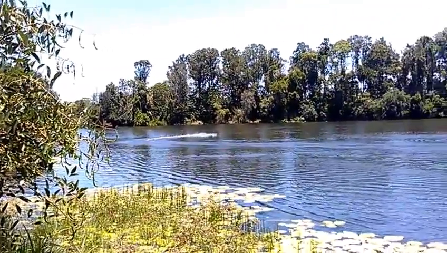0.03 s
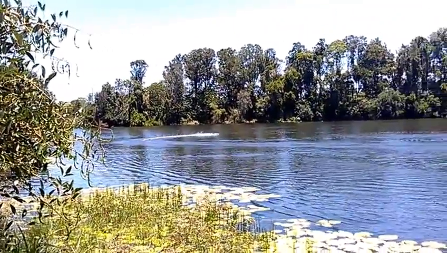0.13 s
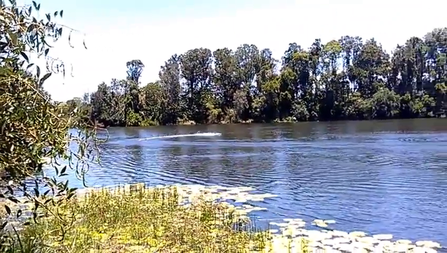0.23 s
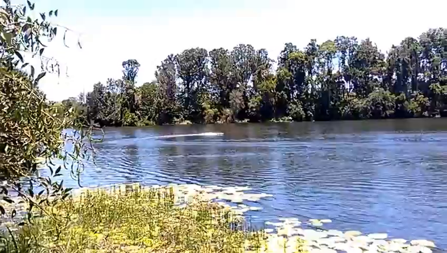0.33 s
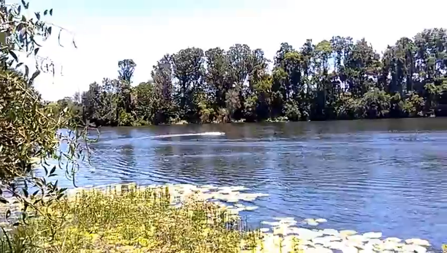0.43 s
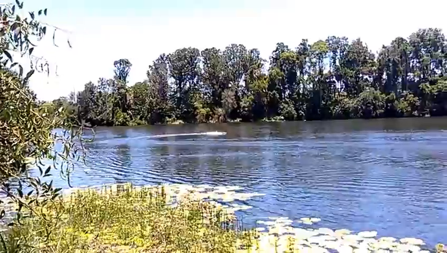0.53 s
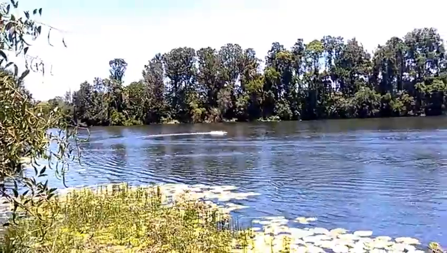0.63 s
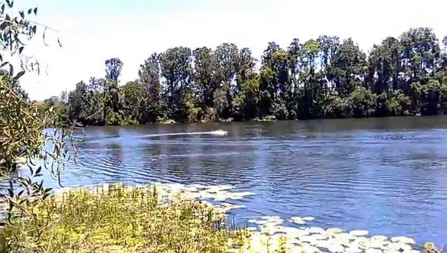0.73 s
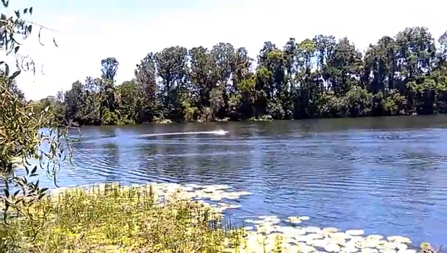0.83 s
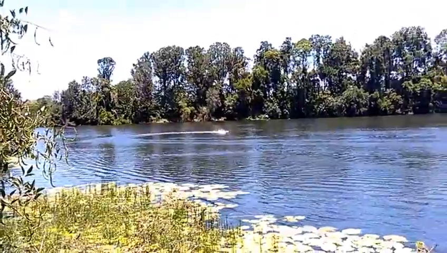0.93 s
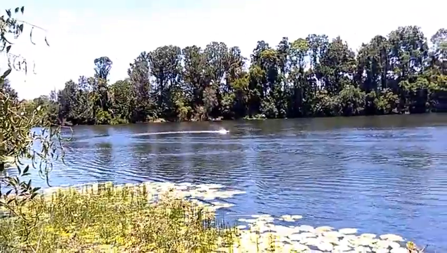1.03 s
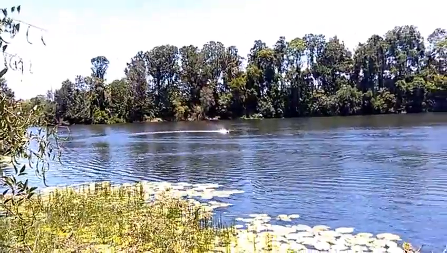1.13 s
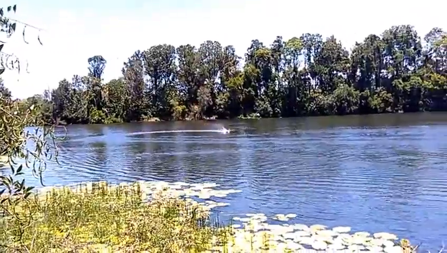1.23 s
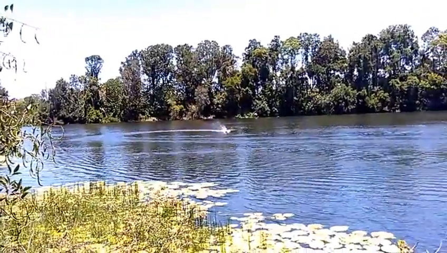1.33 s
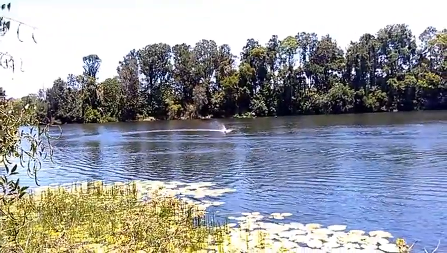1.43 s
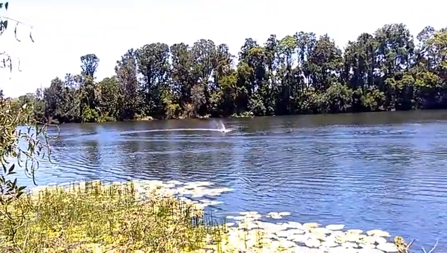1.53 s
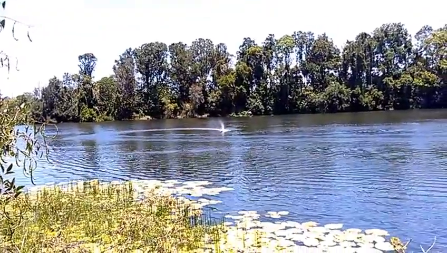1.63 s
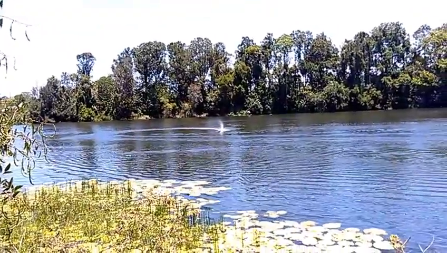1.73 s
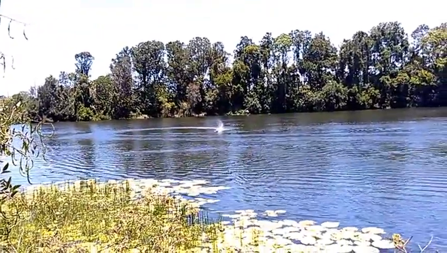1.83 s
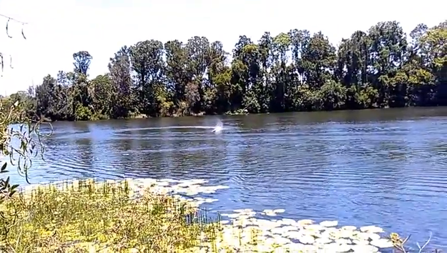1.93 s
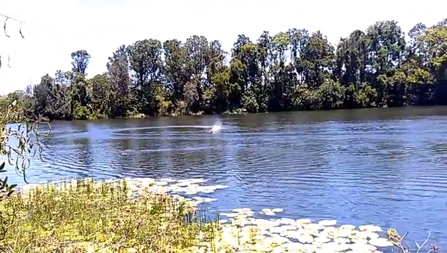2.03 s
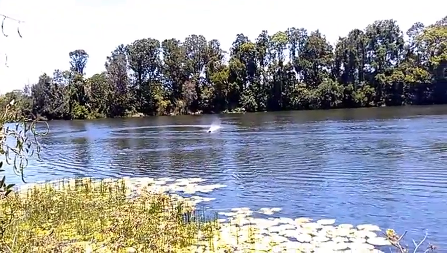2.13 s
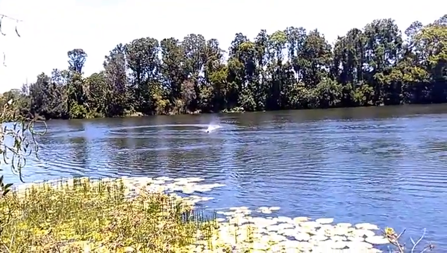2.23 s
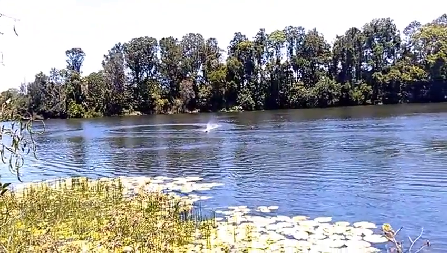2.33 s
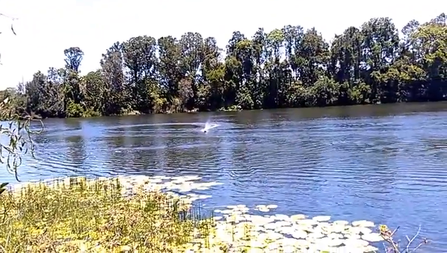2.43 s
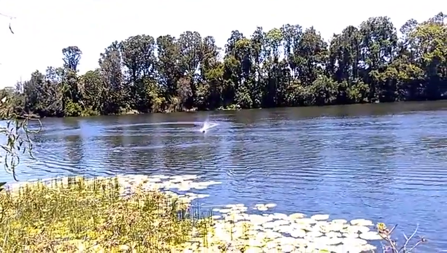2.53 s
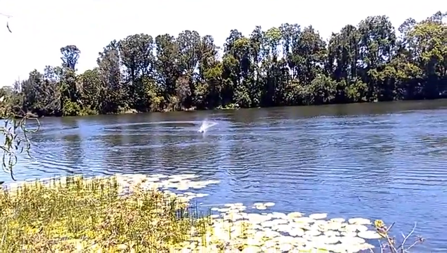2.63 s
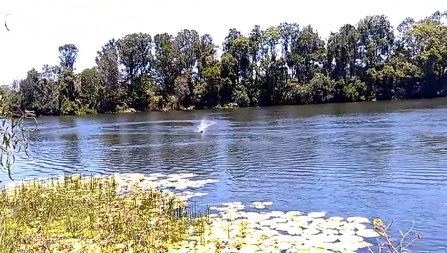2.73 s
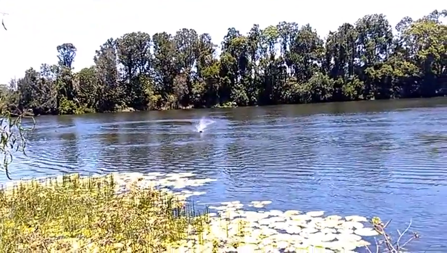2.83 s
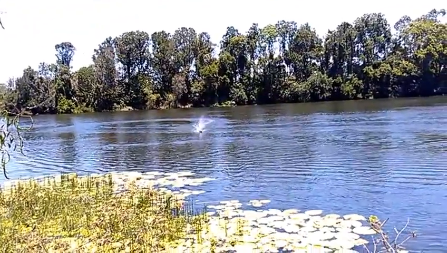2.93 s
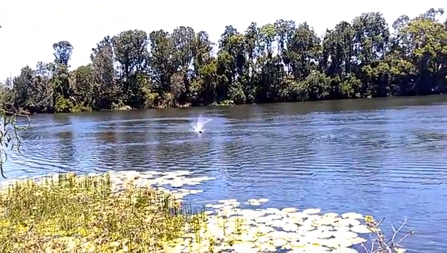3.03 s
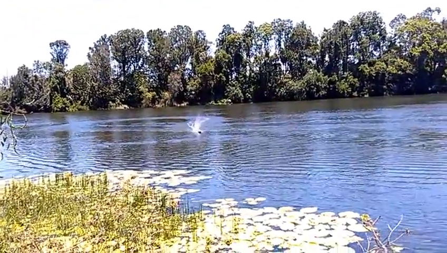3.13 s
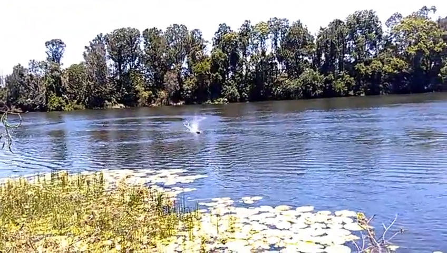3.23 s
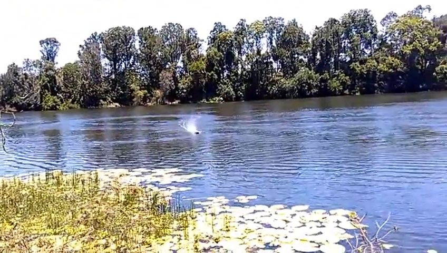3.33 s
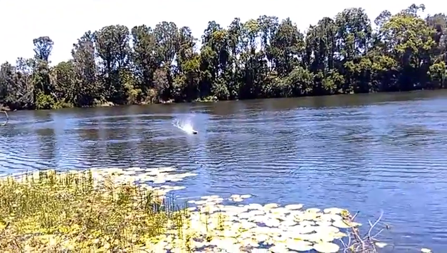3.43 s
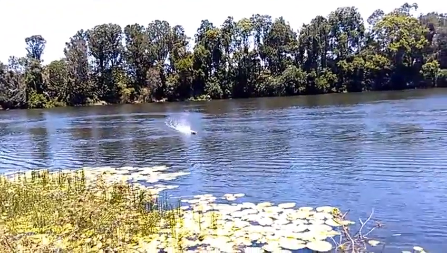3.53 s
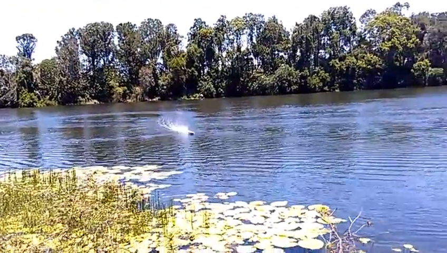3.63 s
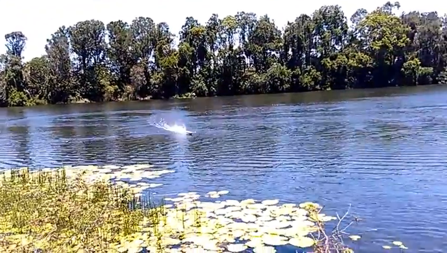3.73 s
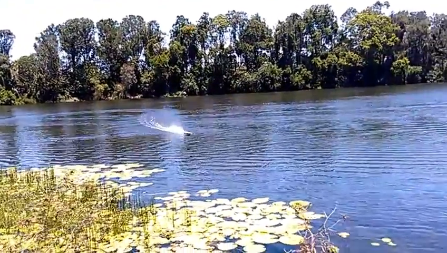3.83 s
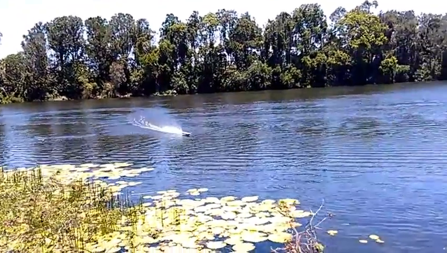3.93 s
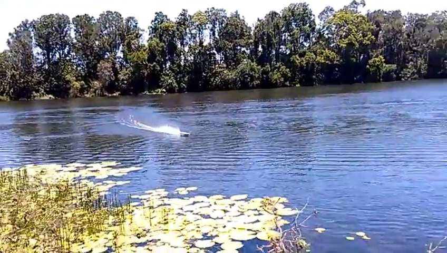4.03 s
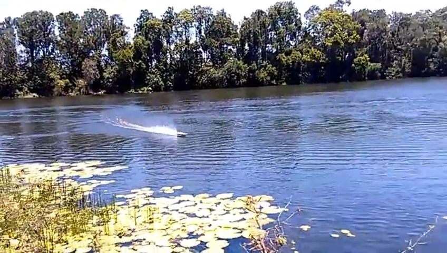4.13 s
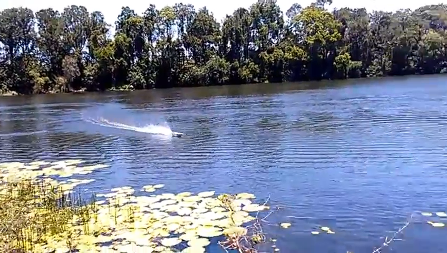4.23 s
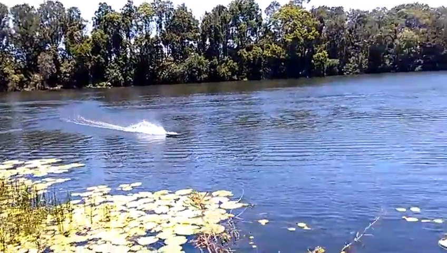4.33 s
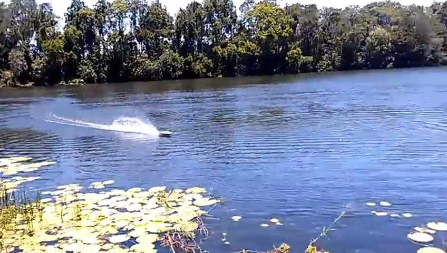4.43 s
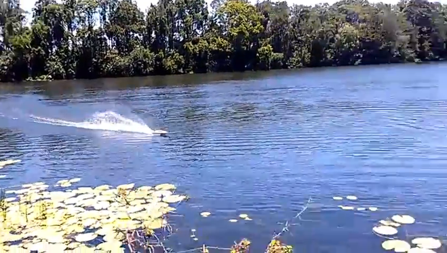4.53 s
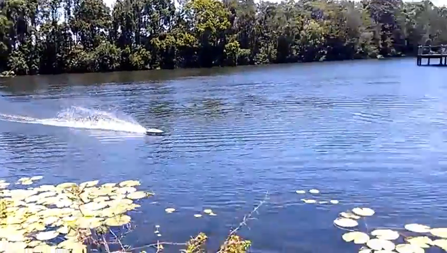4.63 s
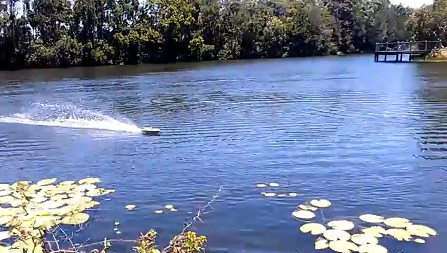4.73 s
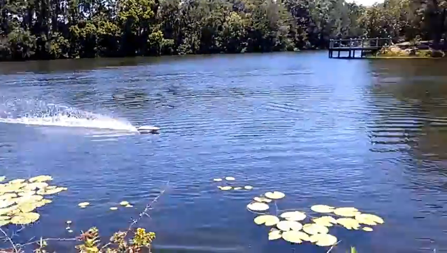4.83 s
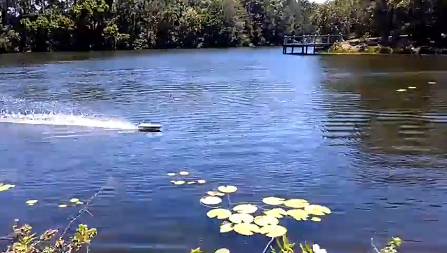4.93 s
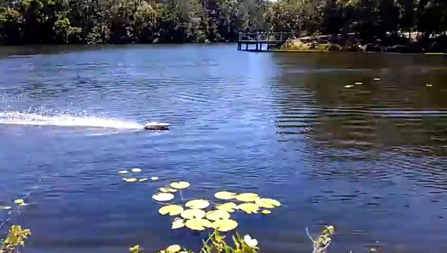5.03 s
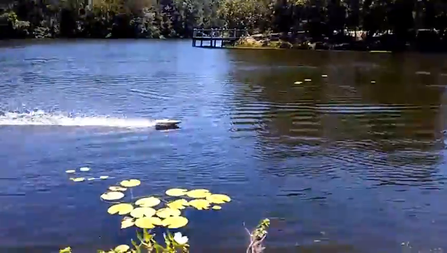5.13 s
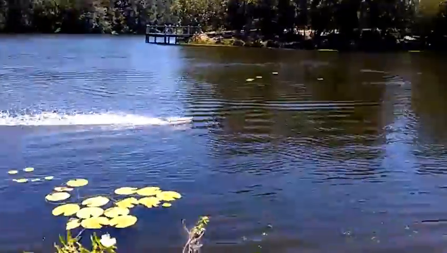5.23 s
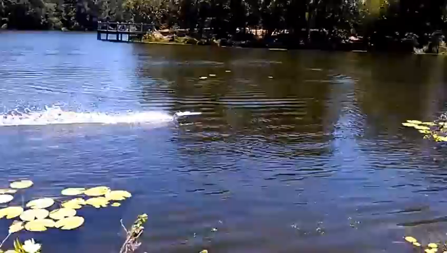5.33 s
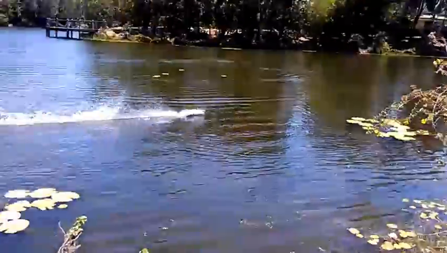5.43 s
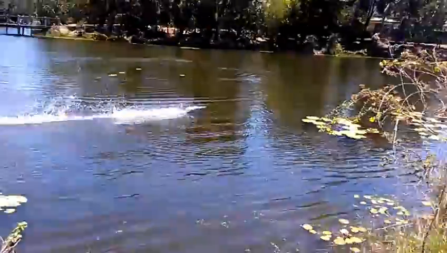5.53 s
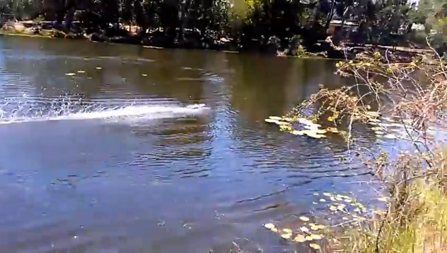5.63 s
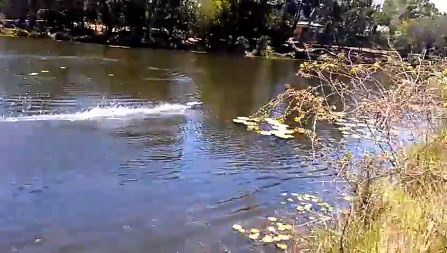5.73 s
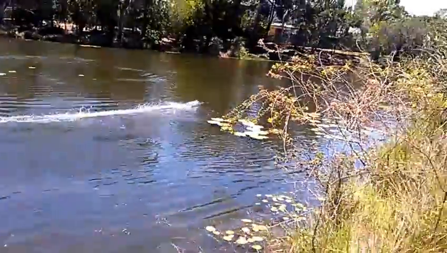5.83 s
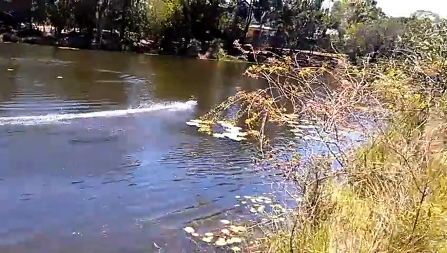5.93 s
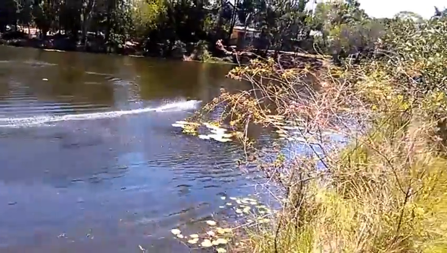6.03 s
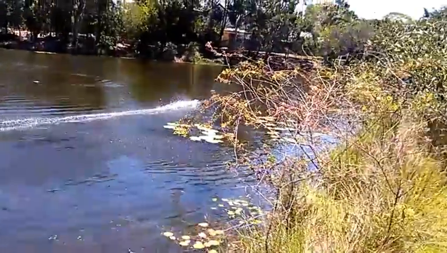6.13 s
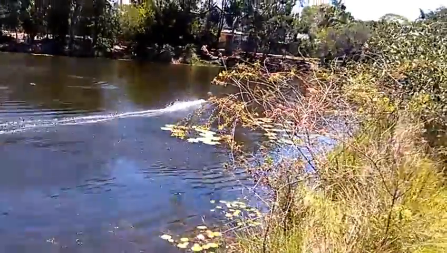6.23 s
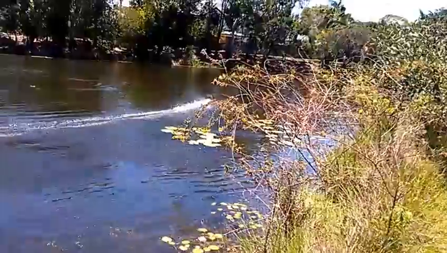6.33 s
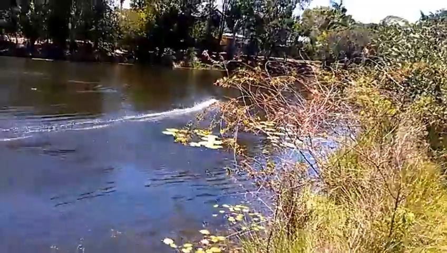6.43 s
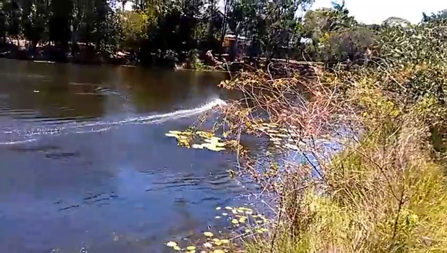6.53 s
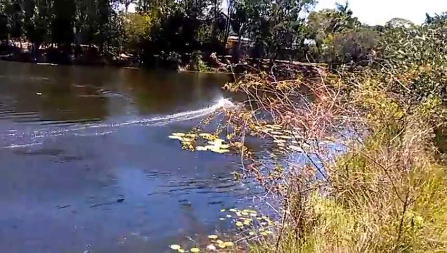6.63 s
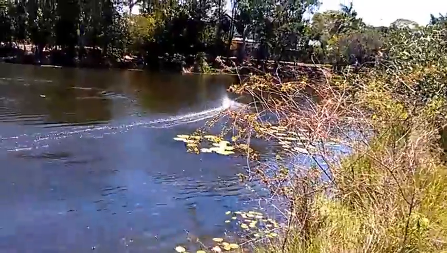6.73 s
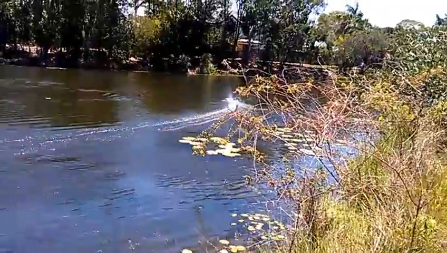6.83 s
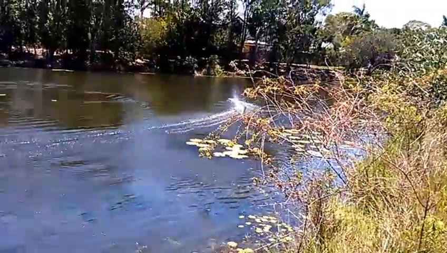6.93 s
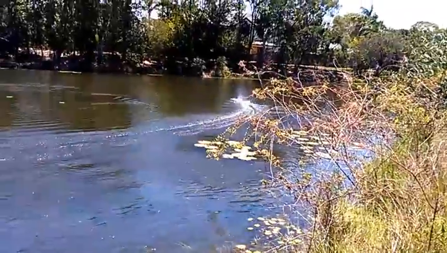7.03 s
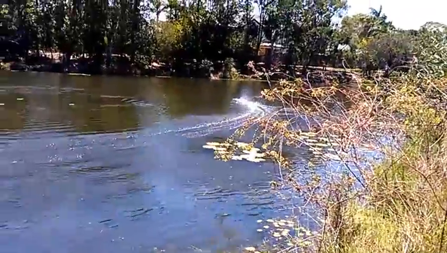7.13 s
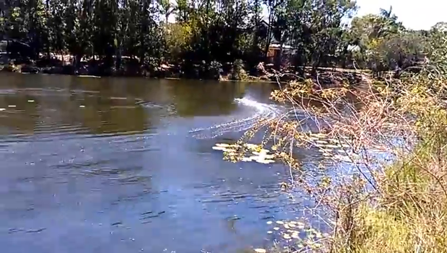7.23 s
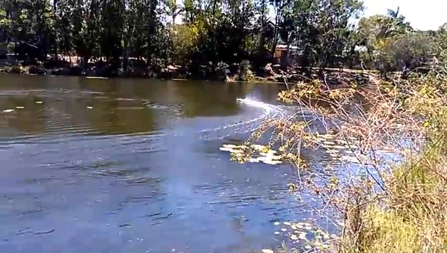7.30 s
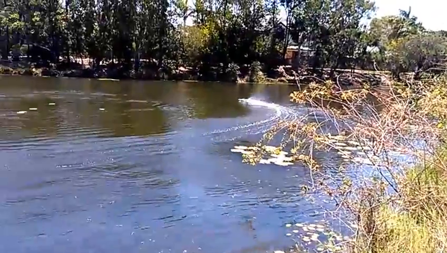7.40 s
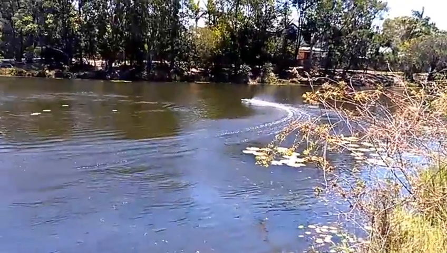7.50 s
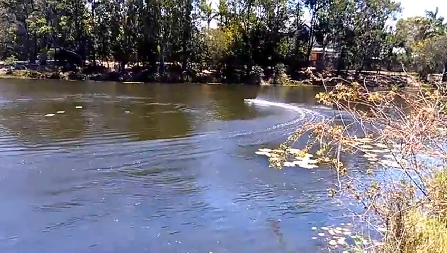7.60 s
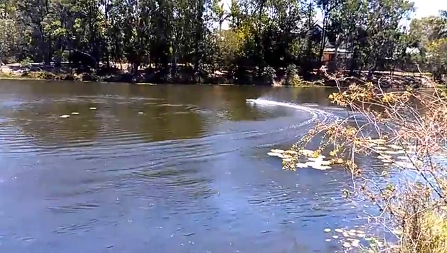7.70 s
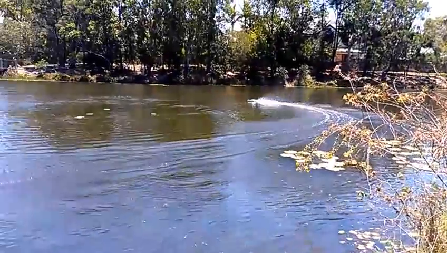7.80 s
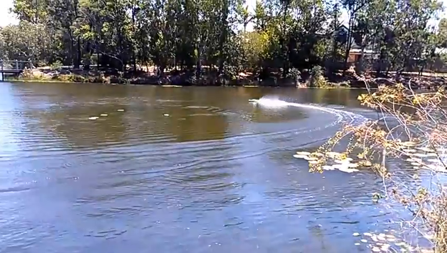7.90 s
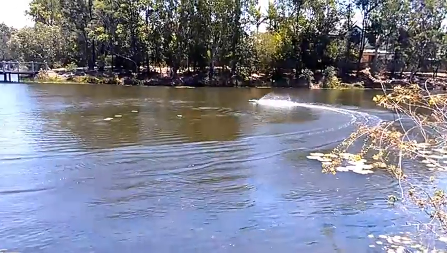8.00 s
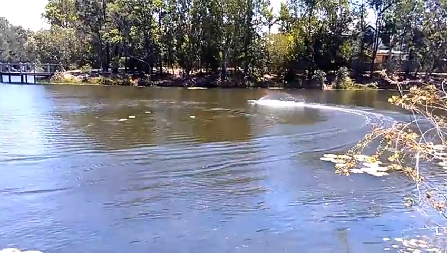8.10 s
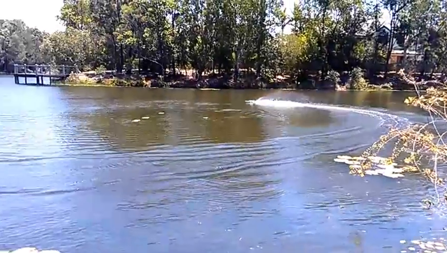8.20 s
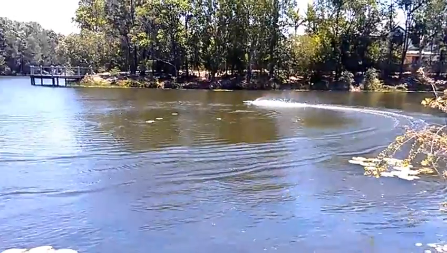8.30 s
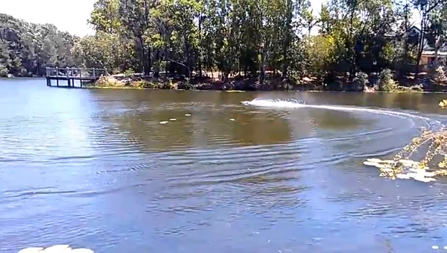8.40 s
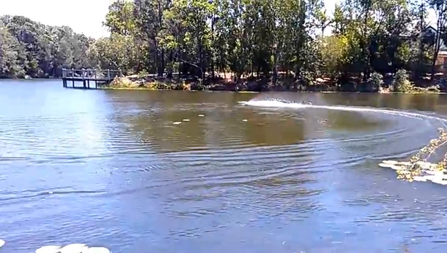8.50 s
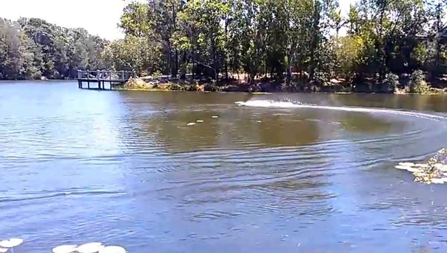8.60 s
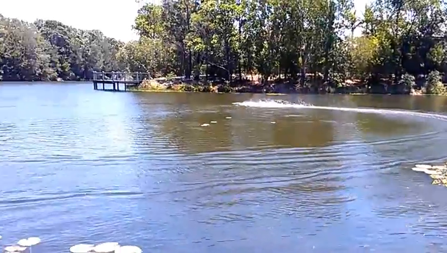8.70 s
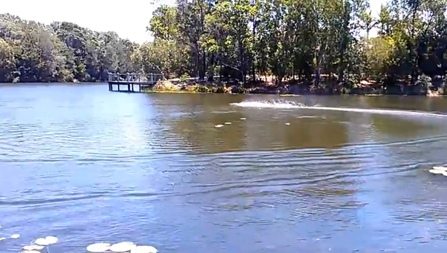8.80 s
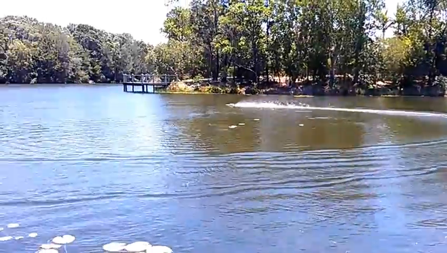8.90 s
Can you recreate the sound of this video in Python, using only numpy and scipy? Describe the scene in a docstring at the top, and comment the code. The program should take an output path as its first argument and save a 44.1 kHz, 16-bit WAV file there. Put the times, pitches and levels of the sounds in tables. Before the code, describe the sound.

A small electric model boat whines across a river with hissing spray, speeding past and turning, as fingers knock on the microphone.

```python
"""First comes a finger knock on the camera's housing, over the whine of a small electric model boat.
The boat cruises on a river, speeds past the bank, hops, slows for a turn and speeds away.
Its shaft and two-bladed propeller sing and chop the water into hissing spray; in the turn the hull
patters on ripples. More knocks dot the foreground. Behind it all, insects buzz in the soft air of
the bank and the far trees answer the boat."""
import sys
import numpy as np
from scipy import signal
from scipy.fft import rfft, irfft, next_fast_len
from scipy.io import wavfile
from scipy.ndimage import uniform_filter1d, map_coordinates

SR = 44100
rng = np.random.default_rng(int(sys.argv[2]) if len(sys.argv) > 2 else 0)


def put_to_file(sound):
    """Save the sound as 16-bit audio at rate SR, in the file named by the first command-line argument."""
    columns = np.atleast_2d(sound).T  # one column per channel
    safe = np.clip(columns, -1, 1)
    whole_steps = np.round(safe * 32767)
    wavfile.write(sys.argv[1], SR, whole_steps.astype(np.int16))


N = 395136


def amp(db):
    """Decibels to gain."""
    return 10 ** (np.asarray(db) / 20)


def unit(x):
    """Scale to rms 1."""
    return x / np.sqrt(np.mean(x ** 2) + 1e-20)


def add(track, s, sound):
    """Mix a sound into a track at s seconds."""
    part = track[round(s * SR):][:len(sound)]
    part += sound[:len(part)]


def along(points, hz):
    """Read (frequency, value) points on a log axis."""
    freqs, values = np.transpose(points)
    return np.interp(np.log(hz + 1), np.log(freqs + 1), values)


def curve(points):
    """An automation line through (time, value) points."""
    return np.interp(np.arange(N) / SR, *np.transpose(points))


def swell(s, length):
    """A bell-shaped rise to 1 at s, length wide at half height."""
    return 0.5 ** np.minimum((2 * (np.arange(N) / SR - s) / length) ** 2, 60)


def swells(rows):
    """Sum the swells of (time, length, size, ..) rows: one curve for each size column."""
    rows = np.array(rows)
    return rows[:, 2:].T @ np.array([swell(s, length) for s, length in rows[:, :2]])


def wobble(rate):
    """A smooth random curve, rate knots a second."""
    knots = rng.standard_normal(int(N * rate / SR) + 4)
    coarse = np.arange(0, N, 16)
    return np.interp(np.arange(N), coarse, map_coordinates(knots, [coarse * rate / SR]))


def filtered(x, response):
    """Equalise x with a gain that is a function of frequency."""
    size = next_fast_len(N + SR // 2)
    return irfft(rfft(x, size) * response(np.fft.rfftfreq(size, 1 / SR)), size)[:N]


def high_pass(x, corner_hz):
    """A steep roll-off of the bass."""
    return filtered(x, lambda hz: 1 - 1 / (1 + (hz / corner_hz) ** 4))


def rush(spectrum, patchy_db):
    """Coloured noise of rms 1 with patches of random gain."""
    bins = signal.stft(rng.standard_normal(N), nperseg=512)[2]
    patches = uniform_filter1d(rng.standard_normal(bins.shape), size=5, axis=0)
    patches = unit(uniform_filter1d(patches, size=12, axis=1))
    noise = signal.istft(bins * amp(patchy_db * patches), nperseg=512)[1][:N]
    return unit(filtered(noise, lambda hz: amp(along(spectrum, hz))))


def ring(modes, life=1, rise_s=0.00055, detune=.014):
    """Struck modes, fresh in strength and tuning on each hit, peak 1; life stretches their decay."""
    t = np.arange(SR // 8) / SR
    x = np.zeros(len(t))
    for hz, db, t60 in modes:
        decay = amp(db + rng.normal(0, 1) - 60 * t / (life * t60))
        x += decay * np.sin(2 * np.pi * hz * rng.normal(1, detune) * t + rng.normal(0, 1))
    x *= 1 - np.exp(-(t / rise_s) ** 2)
    return x / np.abs(x).max()


# Colours of the ambience bed: (frequency [Hz], relative level [dB])
AIR_EQ = [(30, -44), (80, -17.5), (160, -14.5), (300, -5.5), (550, 3), (680, 3), (820, 10.5), (1020, 2.5),
          (1800, 3.5), (2400, -1.5), (3000, -12), (6000, -26), (10000, -43), (15000, -62)]
INSECT_EQ = [(3000, -22), (3750, -1.5), (4300, -38), (6700, -7.5), (7700, 2.5), (8400, -7.5), (9500, -46)]
# Fader of the air, dipping as the boat speeds past: (time [s], level [dB])
AIR_FADER = [(0, -38.5), (1.5, -41), (4.4, -37.5), (4.7, -44.5), (5.55, -58), (5.9, -40), (8.96, -35)]


def bank():
    """The bed: soft air over the river and a steady buzz of insects."""
    air = amp(curve(AIR_FADER) + 0.19 * wobble(2.95)) * rush(AIR_EQ, patchy_db=1.5)
    insects = amp(-47.5 + 1.9 * wobble(4.02)) * rush(INSECT_EQ, patchy_db=2.0)
    return air + insects


# Reverb of the trees, darkening as it dies: (frequency [Hz], t60 [s])
TREE_DECAY = [(200, 1), (2000, 0.21), (10000, 0.065)]


def trees(x, predelay_s=.04):
    """A thin, late answer from the wooded shore."""
    hz, t, bins = signal.stft(rng.standard_normal(SR // 2), SR, nperseg=256)
    decay = amp(-60 * t / along(TREE_DECAY, hz)[:, None])
    tail = signal.istft(bins * decay, SR, nperseg=256)[1]
    delayed = np.pad(x, (round(predelay_s * SR), 0))
    return signal.fftconvolve(delayed, tail / np.linalg.norm(tail))[:N]


# Dull modes of the housing: (frequency [Hz], relative level [dB], t60 [s])
THUD_MODES = [(164, -3.5, 0.065), (233, 0, 0.038), (393, 7.5, 0.033)]
# Cues for the hand: (time [s], peak level [dB])
BUMP_CUES = [(0.385, -37), (0.573, -40), (2.695, -31.5)]


def bumps():
    """The hand bumps the housing: low thuds with a soft attack."""
    out = np.zeros(N)
    for s, db in BUMP_CUES:
        add(out, s, amp(db) * ring(THUD_MODES, rise_s=0.0037))
    return out


# Hollow and bright modes of the housing: (frequency [Hz], relative level [dB], base t60 [s])
HOLLOW_MODES = [(647, 0.5, 0.025), (729, 3, 0.046), (801.5, 2, 0.1), (870, 5, 0.03), (986, 2.5, 0.05)]
CLACK_MODES = [(1250, -1, 0.0047), (1652, 0.5, 0.026), (1805, 9.5, 0.011), (2070, -1, 0.012),
               (2310, 9, 0.015), (2550, 4, 0.0058), (2935, -5.5, 0.016), (3500, -10, 0.022)]
# Knocks on the housing, mostly finger taps; the one at 5.5545 s is the hull landing after its leap: (time [s],
# gain [dB], hollowness [dB], decay stretch [ratio])
KNOCK_CUES = [(0.0158, -14, -3.5, 1.15), (.147, -24.5, 6.5, 0.64), (0.2861, -13.5, -2, 0.44),
              (0.5223, -14.5, -0.5, 0.96), (0.5333, -15.5, -18, 0.99), (0.945, -31, 9, 0.6),
              (1.2004, -23.5, 3, 0.7), (1.283, -15, -0.5, 0.63), (1.723, -13.5, 5, 2.8),
              (4.186, -3, -6.5, 1.8), (4.323, -12, -8, .7), (4.331, -13, 2, 0.92), (4.693, -10.5, -18, 1.9),
              (4.842, -6, 3, 0.85), (5.0561, -5.5, -11, 1.9), (5.185, -18.5, -4, 0.64),
              (5.379, -11, -8, 0.59), (5.5545, -21, -3, 0.63), (7.7727, -5, -5, 1.6),
              (7.871, -1.5, -8, 1.5)]


def knocks():
    """Fingers tap the housing, and once the hull lands hard: a crisp snap, a short rattle, a bright clack and a
    hollow ring."""
    out, t = np.zeros(N), np.arange(SR // 4) / SR
    mids = signal.butter(6, [700, 2600], "bandpass", fs=SR, output="sos")
    highs = signal.butter(3, [2500, 6000], "bandpass", fs=SR, output="sos")

    def burst(band, db, t60):
        return amp(db - 60 * t / t60) * unit(signal.sosfilt(band, rng.standard_normal(len(t))))

    for s, db, hollow_db, life in KNOCK_CUES:
        rattle = burst(mids, db=-17.5, t60=0.12)
        snap = burst(highs, db=-17 - .35 * hollow_db, t60=.018)  # hollower knocks land softer
        add(out, s, amp(db) * (snap + rattle))
        clack = ring(CLACK_MODES, life)
        hollow = amp(hollow_db - 4.0) * ring(HOLLOW_MODES, life, rise_s=0.00083)
        add(out, s, amp(db) * (clack + hollow))
    return out


# Finger drags: (time [s], length [s], gain of a slip [dB])
DRAG_CUES = [(0.535, 0.037, -27), (1.731, 0.058, -24), (4.237, 0.11, -20.5), (7.78, 0.031, -20)]


def drags(gap_s=0.0083):
    """A finger drags on the housing in quick slips, each ringing the shell."""
    out = np.zeros(N)
    for s, length, db in DRAG_CUES:
        for delay in np.cumsum(gap_s * rng.uniform(.5, 1.5, size=24)):
            slip = ring(HOLLOW_MODES, life=0.43) + amp(-4) * ring(CLACK_MODES)
            if delay < length:
                add(out, s + delay, amp(db) * slip)
    return out


# Modes of the hull: (frequency [Hz], relative level [dB], t60 [s])
HULL_MODES = [(751, -8, 0.11), (821, -1.5, 0.059), (833, -10, 0.034)]


def patter():
    """The hollow hull slaps over the ripples at an uneven rate."""
    out = np.zeros(N)
    times = np.cumsum(rng.uniform(.016, .042, size=400))
    for s in times[times < N / SR]:
        add(out, s, amp(rng.normal(0, 1.7)) * ring(HULL_MODES, rise_s=0.0028))
    return unit(out)


# Colours of the water layers, dark to bright: (frequency [Hz], relative level [dB])
WASH_EQ = [(100, -76), (250, -40), (400, -1.5), (600, -8), (740, 0.5), (850, -3), (1050, -18), (2000, -48)]
SPLASH_EQ = [(400, -58), (650, -18), (880, -9), (1150, -11.5), (1380, -9.5), (1800, 2), (2350, 0),
             (2900, -6.5), (4500, -12), (8000, -70)]
HISS_EQ = [(800, -65), (2000, -5.5), (3050, -9), (3700, -1), (4500, -3.5), (5800, -2.5), (6800, -13.5),
           (8200, -18.5), (10000, -27), (14000, -80)]
MIST_EQ = [(4000, -12), (6500, 4.5), (8000, 6), (9000, 0), (10500, -4), (12500, -15), (15500, -50)]


def spray(angle, db, low_cut_hz=375):
    """Each blade tears the surface, so the spray pulses with the shaft; the hull pushes a low wash."""
    pulse_db = 2.4 * np.sin(2 * angle) + 1.1 * np.sin(angle)
    chop = unit(amp(pulse_db + 1.1 * wobble(45) + 0.44 * wobble(500)))
    hiss = amp(db["hiss"]) * rush(HISS_EQ, patchy_db=1.5)
    splash = amp(db["splash"]) * rush(SPLASH_EQ, patchy_db=2.5)
    mist = amp(db["mist"]) * rush(MIST_EQ, patchy_db=2.5)
    wash = amp(db["wash"]) * rush(WASH_EQ, patchy_db=2.0)
    thrown = high_pass(chop * (hiss + splash + mist), low_cut_hz)
    return high_pass(thrown + wash, low_cut_hz)  # so small a splash carries no bass


def partial(angle, fade_db, blur_rad, flutter_db):
    """A tone of rms 1 that fades, flutters and blurs in phase over the rippled water."""
    gain = amp(fade_db * wobble(18) + flutter_db * wobble(65))
    return unit(gain * np.sin(angle + blur_rad * wobble(70) + rng.uniform(0, 2 * np.pi)))


# The whine, a row per shaft order from 5 to 14: (cruising gain [dB], full-throttle gain [dB])
WHINE_ORDERS = [(-18.5, -7.5), (-16, -2), (-27, -7.5), (-15, -11), (-19, -8), (-20, -5), (-20, -11),
                (-19, -7.5), (-20.5, -39), (-15.5, -11)]
# Single overtones flare up: (time [s], length [s], shaft order, boost [dB])
WHINE_FLARES = [(.72, .45, 13, 8), (1.35, .4, 13, 13), (2.4, 0.45, 13, 8), (3.253, 0.49, 13, 17),
                (3.85, 0.99, 10, 5.5), (5.3, 0.3, 6, 4.5), (5.926, .2, 8, 2), (7.85, .15, 12, 19),
                (8.116, 0.25, 5, 6), (8.77, 0.32, 6, 0.5), (8.83, 0.33, 12, 5)]
# The thin top layer: (shaft order)
THIN_ORDERS = (8, 13, 16, 17, 18, 20, 22)


def motor(angle, throttle, db):
    """Shaft and propeller sing: four low orders, a whine that shifts with throttle, and a thin top."""
    low = amp(db["shaft"]) * partial(angle, fade_db=2, blur_rad=0.058, flutter_db=1.0)
    low += amp(db["blade"]) * partial(2 * angle, fade_db=.9, blur_rad=.25, flutter_db=1.3)
    low += amp(db["third"]) * partial(3 * angle, fade_db=1.5, blur_rad=.25, flutter_db=1.5)
    low += amp(db["fourth"]) * partial(4 * angle, fade_db=1.1, blur_rad=.3, flutter_db=1.6)
    whine = np.zeros(N)
    blur_per_order = .03 + .04 * throttle
    for k, (cruise_db, full_db) in enumerate(WHINE_ORDERS, 5):
        flare_db = sum(boost * swell(s, length) for s, length, order, boost in WHINE_FLARES if order == k)
        gain = amp(cruise_db + (full_db - cruise_db) * throttle + flare_db)
        whine += gain * partial(k * angle, fade_db=3, blur_rad=k * blur_per_order, flutter_db=3)
    thin = unit(sum(partial(k * angle, fade_db=3, blur_rad=.25, flutter_db=2) for k in THIN_ORDERS))
    bite = amp(0.97 * wobble(120))  # the blades grip the broken surface unevenly
    return bite * (low + amp(db["whine"]) * whine + amp(db["thin"]) * thin)


# Master fader of the boat as it nears and recedes: (time [s], level [dB])
BOAT_FADER = [(0, -43), (0.45, -41.5), (1.1, -45.5), (1.8, -45.5), (3, -37.5), (4.2, -33.5), (4.9, -31.5),
              (5.6, -34), (6.15, -29), (6.85, -34.5), (7.4, -34), (7.85, -30.5), (8.25, -33.5), (8.96, -31)]
# Ride of the whine on top of that fader: (time [s], offset [dB])
WHINE_RIDE = [(0, 2.5), (2.4, 3), (4.25, 1), (4.5, 1), (5.4, -3.5), (5.7, -2), (6.3, 0), (7.8, -31),
              (8.08, 2.5), (8.6, 0.5), (8.96, 5.5)]
# Where the bow points: (time [s], course [-1 coming, 0 passing, 1 leaving])
HEADING = [(0.35, 0.14), (0.9, -0.73), (4.3, -0.63), (5.08, 0.16), (5.3, 0.092), (6.3, -0.04), (7.4, 0.52),
           (8.5, 0.85), (8.96, 0.34)]
# Balance by layer: (coming [dB], passing [dB], leaving [dB], full-throttle boost [dB])
LAYER_BALANCE = { "shaft": (-13.5, -24.5, -25.5, 13), "blade": (-29.5, -13, -0.5, 14.5),
                 "third": (-4, -22.5, -4.5, 4.5), "fourth": (-13, -19, -18, 15.5),
                 "hiss": (1.5, -0.65, 3, 3), "splash": (-6.5, -5.5, -10, 6.5),
                 "wash": (-14.5, -9.5, -10, 1.5), "mist": (-12, -9, -14, 0)}
# The hull slaps into a wave and bites, boosting the layers; negative values dip them, as at 5.07 s where the
# water's reflection cancels the blade tone at the closest pass: # (time [s], length [s], hiss [dB], splash
# [dB], blade tone [dB], overtones [dB])
WAVE_SLAPS = [(0.2, 0.32, 7.5, 11.5, 7, 7), (4.395, 0.06, -1.5, 1, 9, 0), (4.485, 0.19, 3, 9.5, 16.5, 6.5),
              (4.595, 0.048, -2, 6, 9, 11.5), (4.652, 0.015, 4, 1, 1, -6), (4.785, 0.12, 5, 5, 10, 5.5),
              (4.812, 0.058, 5.5, 2.5, -7, -2), (4.98, 0.079, 11, 11.5, 0.5, 17),
              (5.07, 0.07, 5.5, 3, -15, 14.5), (5.145, 0.056, 0.5, -2, -3.5, 10),
              (5.337, 0.033, 2, 5.5, 4, 8.5), (5.375, 0.16, 1, 1, 12.5, 7.5), (5.495, 0.045, 1, 1.5, 7, 2),
              (5.564, 0.013, 4, -11, 14, -5), (5.92, 0.38, 3.5, 7, 12, -4), (5.945, 0.073, 5, 4.5, -3, 0),
              (6.2, 0.2, -1, 0, -6, 3), (6.55, 0.33, -0.5, 5, 0.5, 2), (8.058, 0.056, 8.5, 9, 5, 12),
              (8.165, 0.073, 4.5, 8, 5, 16.5), (8.4, 0.096, 3.5, 8.5, 0.5, 9), (8.69, 0.07, 2, 10.5, 2, 3),
              (8.785, 0.061, 6.5, 6, -0.5, 8.5), (8.845, 0.052, 3, 9.5, 1.5, -16)]
# The hull skips clear and the spray breaks off; the row at 5.66 s is instead a lull as the throttle is let off:
# # (time [s], length [s], spray dip [dB], blade tone dip [dB], overtone dip [dB])
HULL_SKIPS = [(4.52, 0.031, 0, 14, 0.5), (4.635, 0.027, 4, 0, 9), (5.025, .04, 3, 0, 8),
              (5.205, 0.079, 10.5, -1, 5.5), (5.45, 0.042, 11, -4, 5), (5.66, 0.079, 5.5, 0, -7),
              (7.92, 0.11, -1, 6, 2), (8.818, 0.012, 0.5, 17, 18)]
# Turns duck the hiss and the whine: (time [s], length [s], dip [dB])
TURN_DIPS = [(1.5, 0.33, 7), (6.72, 0.68, 5.5)]


def layer_levels(speed, throttle, leap):
    """Each boat layer's level in dB, from nearness, course, throttle and how the hull meets the water."""
    near_db, course = curve(BOAT_FADER), curve(HEADING)
    db = {name: near_db + np.interp(course, [-1, 0, 1], by_course) + boost * throttle
          for name, (*by_course, boost) in LAYER_BALANCE.items()}
    slap_hiss, slap_splash, slap_blade, slap_overtones = swells(WAVE_SLAPS)
    skip_spray, skip_blade, skip_overtones = swells(HULL_SKIPS)
    turn = swells(TURN_DIPS)[0]
    overtones = slap_overtones - skip_overtones
    slowing = np.clip(-np.gradient(speed) * SR / 430, 0, 1)  # full at a loss of 430 Hz a second
    slowing = uniform_filter1d(slowing, size=round(0.031 * SR))
    airborne_db, coast_spray_db = -18 * leap, 2.5 * slowing
    unloaded = airborne_db - 8 * slowing  # a lifted or slowing propeller's tones sink
    db["shaft"] += 0.5 * overtones + 9.5 * leap
    db["blade"] += slap_blade - skip_blade + unloaded
    db["third"] += 0.5 * overtones + unloaded
    db["fourth"] += overtones + unloaded
    db["whine"] = near_db + curve(WHINE_RIDE) + slap_hiss - skip_overtones - turn + unloaded
    stern_swing = swell(7.3, length=.8)  # the stern swings toward the bank
    db["thin"] = near_db - 21 + 12 * stern_swing - turn + unloaded
    db["hiss"] += slap_hiss - skip_spray - turn - 2.5 * leap + coast_spray_db
    db["splash"] += slap_splash - 0.64 * skip_spray + airborne_db + coast_spray_db
    db["wash"] += 0.57 * slap_splash - skip_spray + airborne_db
    db["mist"] += 0.92 * slap_hiss - skip_spray
    own_ripples = swell(TURN_DIPS[-1][0] + 0.41, length=0.63)  # the hull meets them after the near turn
    db["patter"] = near_db - 13.5 + 12 * own_ripples
    return db


# Pitch line of the motor: (time [s], shaft speed [Hz])
SHAFT_SPEED = [(0, 272), (.4, 273), (.65, 281.5), (1.2, 283), (1.7, 288), (3, 292.5), (4.29, 292),
               (4.45, 403), (5.05, 406.5), (5.54, 395), (5.6, 340), (5.68, 320), (5.78, 252), (6.06, 238),
               (6.18, 288), (6.8, 278), (7.77, 275), (7.88, 293), (7.95, 318), (8.06, 393), (8.3, 390),
               (8.96, 393.5)]
CRUISE_HZ, FULL_HZ = 280, 400
LEAP_S, LEAP_LENGTH_S, LEAP_EDGE_S = 5.502, 0.066, .012


def model_boat():
    """One shaft drives whine and spray over the hull's patter; in a leap it lifts out and races."""
    since_takeoff = np.arange(N) / SR - LEAP_S
    leap = np.clip(np.minimum(since_takeoff, LEAP_LENGTH_S - since_takeoff) / LEAP_EDGE_S, 0, 1)
    speed = curve(SHAFT_SPEED) + 30.26 * leap * since_takeoff / LEAP_LENGTH_S
    throttle = np.maximum(speed - CRUISE_HZ, 0) / (FULL_HZ - CRUISE_HZ)
    db = layer_levels(speed, throttle, leap)
    sway = 1 + (.002 + .002 * throttle) * wobble(25)  # the propeller's load varies
    shudder_rad = .07 * throttle * wobble(170)  # biting blades jerk the shaft and fray the upper orders
    angle = 2 * np.pi * np.cumsum(speed * sway) / SR + shudder_rad
    return motor(angle, throttle, db) + spray(angle, db) + amp(db["patter"]) * patter()


def scene():
    """The mono mix: the boat, its echo, the bank and the hand on the housing."""
    boat = model_boat()
    background = amp(-24) * trees(boat) + bank()
    fingers = high_pass(knocks() + drags(), corner_hz=360)  # the small shell radiates little bass
    return (background + fingers + bumps() + boat)[None]


def record(dry, ceiling=.9, top_hz=15800):
    """The camera rounds off the loudest peaks, drops the bass and keeps nothing above its band limit."""
    rounded = dry[0] / (1 + (dry[0] / ceiling) ** 8) ** (1 / 8)
    return filtered(high_pass(rounded, corner_hz=135), lambda hz: hz < top_hz)[None]


dry = scene()
out = record(dry)
put_to_file(out)
```